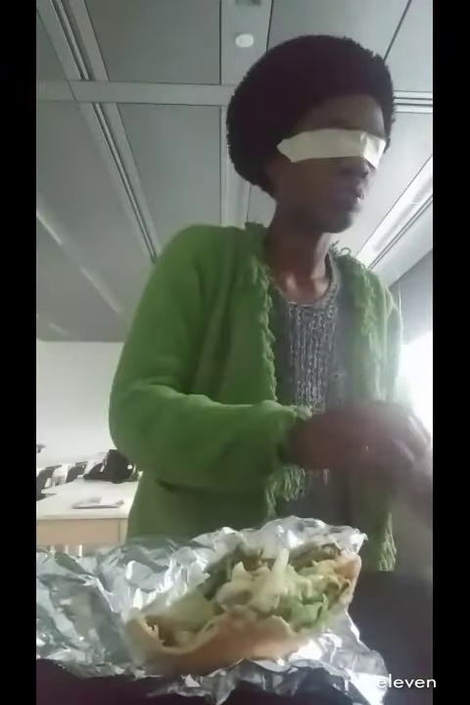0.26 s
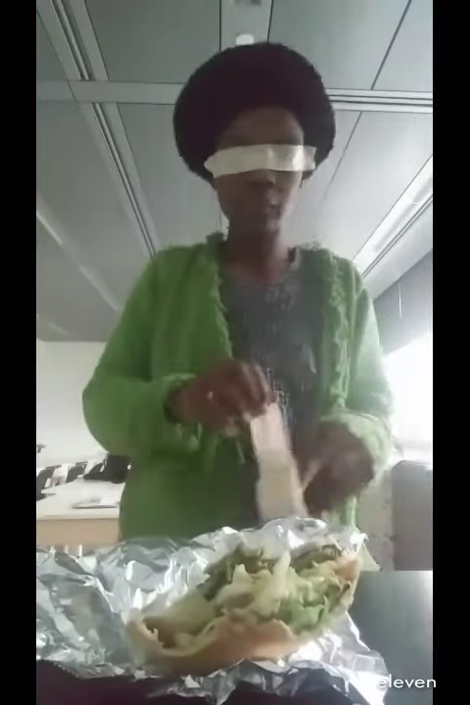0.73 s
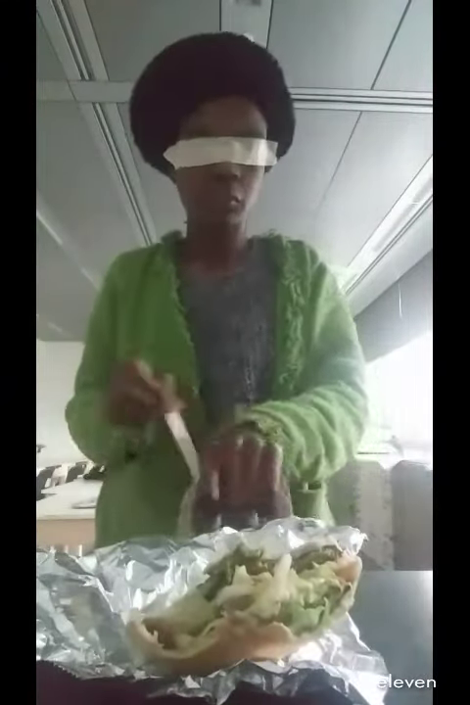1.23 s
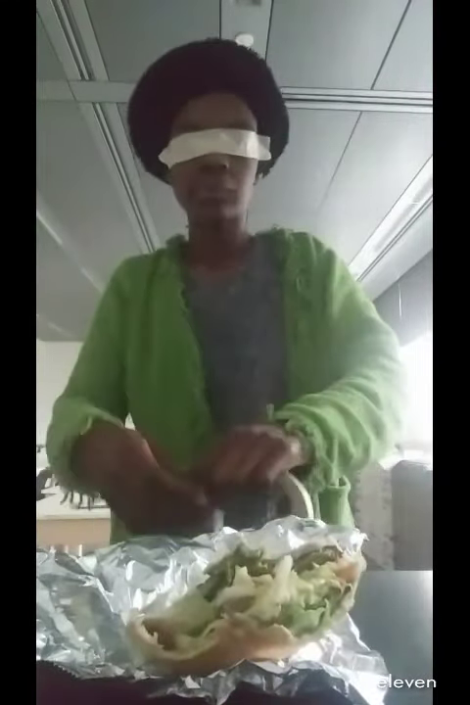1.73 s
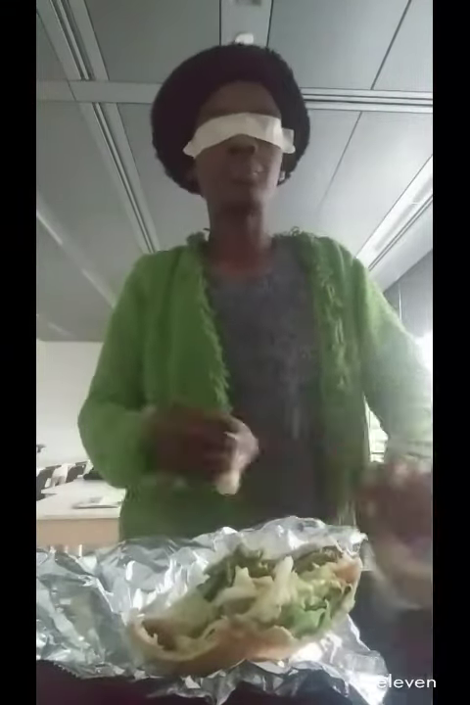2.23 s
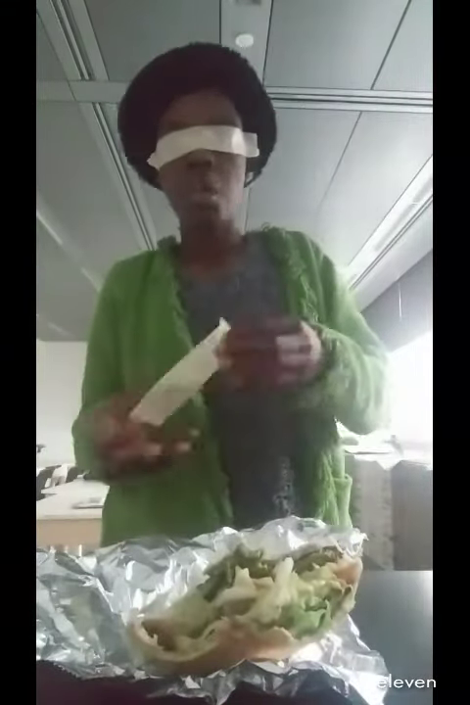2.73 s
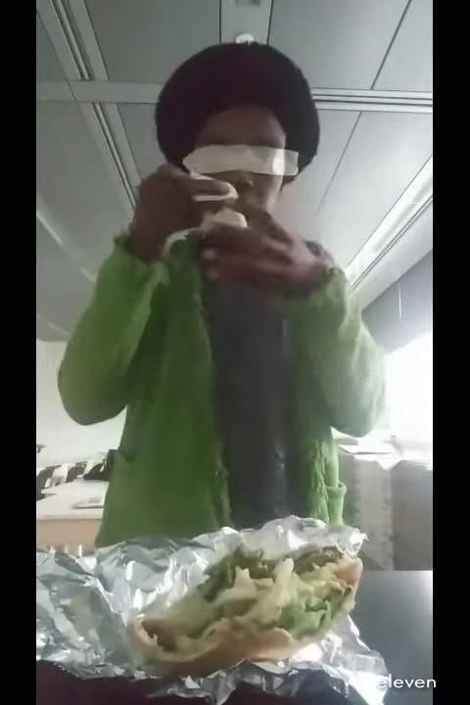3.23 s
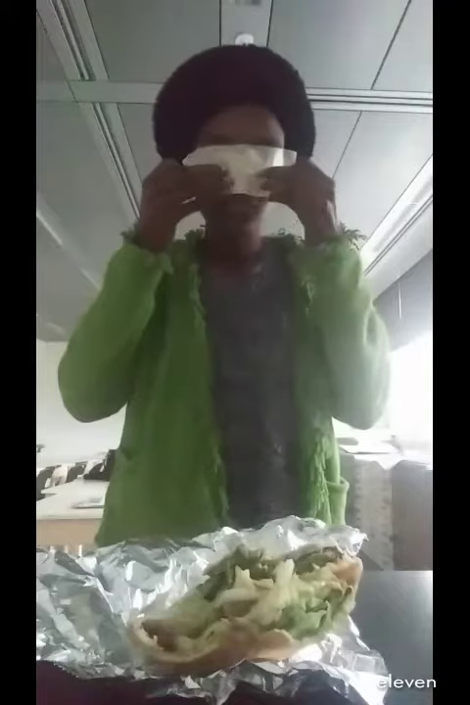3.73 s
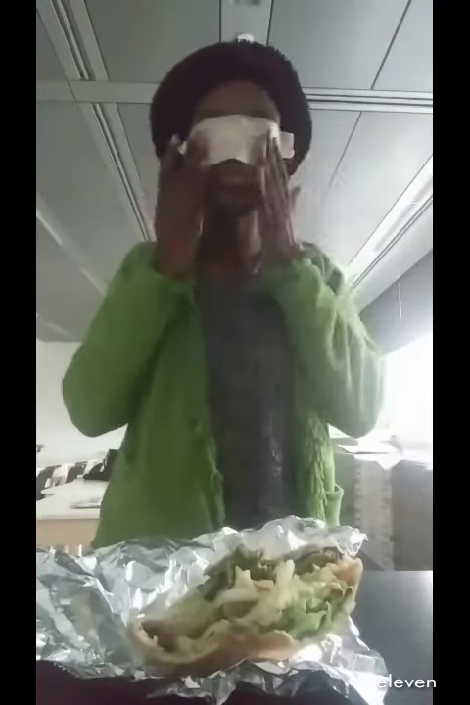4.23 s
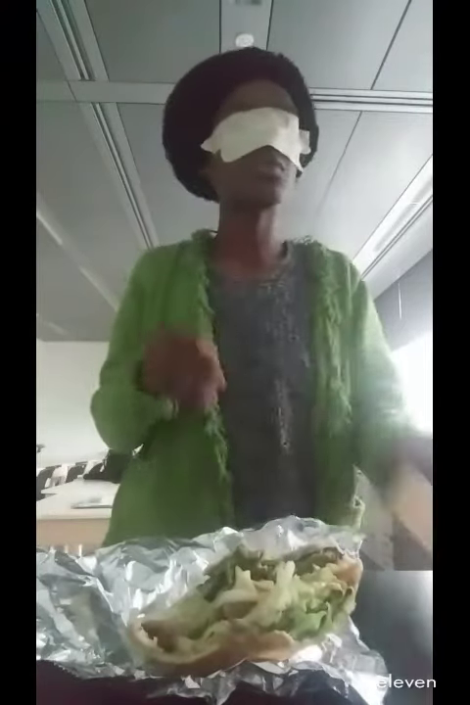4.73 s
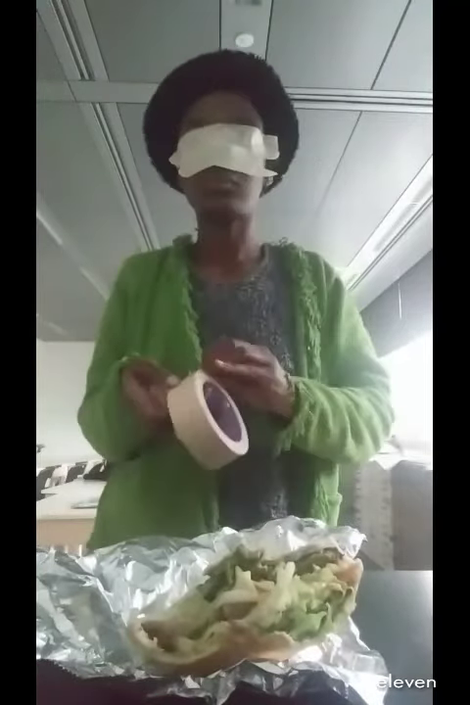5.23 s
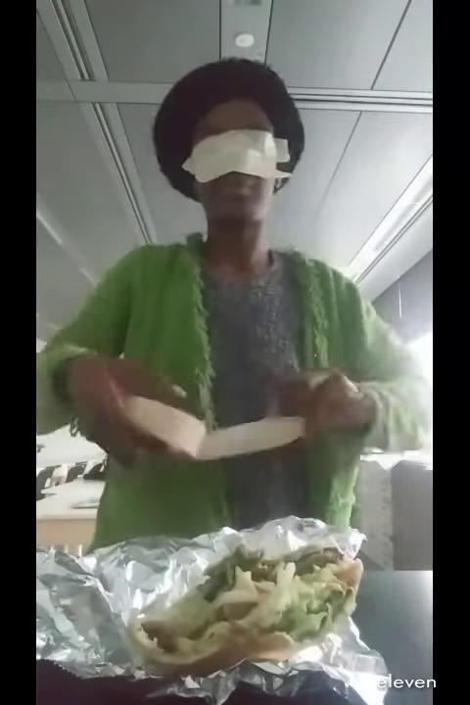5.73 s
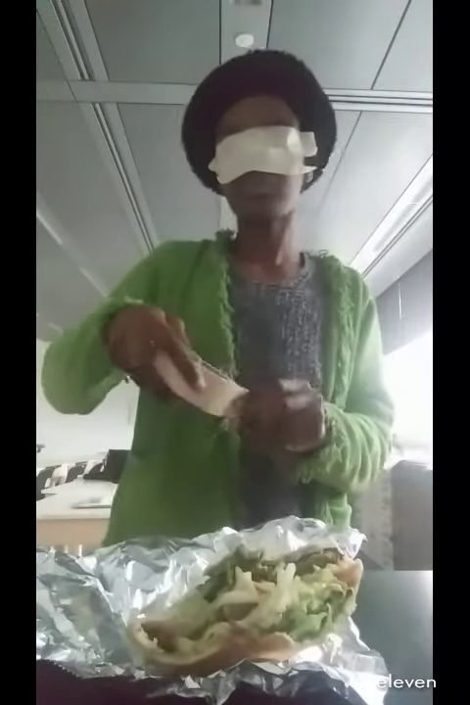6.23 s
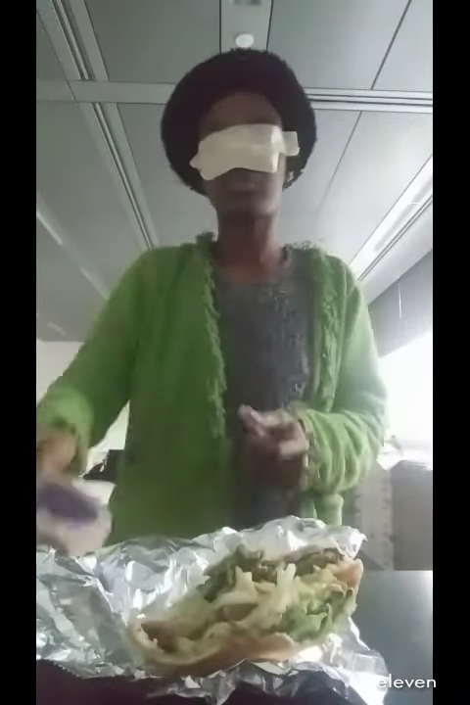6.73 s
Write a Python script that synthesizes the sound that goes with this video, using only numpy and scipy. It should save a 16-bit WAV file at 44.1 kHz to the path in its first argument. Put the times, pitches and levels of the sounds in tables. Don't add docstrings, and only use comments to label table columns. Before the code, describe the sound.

Masking tape is jerked off its roll in short harsh rips and torn, with desk knocks, finger rustle and faint ventilation hum.

```python
import sys
import numpy as np
from scipy import signal
from scipy.fft import rfft, irfft, next_fast_len
from scipy.io import wavfile
from scipy.ndimage import uniform_filter1d, minimum_filter1d, map_coordinates

SR = 44100
rng = np.random.default_rng(int(sys.argv[2]) if len(sys.argv) > 2 else 0)


def to_linear_factor(level_db):
    exponent = np.asarray(level_db, float) / 20
    return 10 ** exponent


def inscribe(sig):
    pcm = np.round(np.clip(np.atleast_2d(sig).T, -1, 1) * 32767)
    wavfile.write(sys.argv[1], SR, pcm.astype(np.int16))


N = 307377


def unit(x):
    return x / np.sqrt(np.mean(abs(x) ** 2) + 1e-20)


def along(points, hz):
    f, v = np.transpose(points)
    return np.interp(np.log(hz + 1), np.log(f + 1), v)


def filtered(x, response):
    m = next_fast_len(N + SR // 2)
    return irfft(rfft(x, m) * response(np.fft.rfftfreq(m, 1 / SR)), m)[..., :N]


def resonances(modes):
    def response(f):
        total = 0
        for k, (centre, width, db) in enumerate(modes):
            damping = 1j * f * width
            total = total + (-1) ** k * to_linear_factor(db) * damping / (centre ** 2 - f ** 2 + damping)
        return unit(total)
    return response


def steep(lo_hz, hi_hz):
    return lambda f: (1j * f / (lo_hz + 1j * f)) ** 3 * (hi_hz / (hi_hz + 1j * f)) ** 2


def wobble(rate):
    knots = rng.standard_normal(int(N * rate / SR) + 4)
    return map_coordinates(knots, [np.arange(N) * rate / SR])


def slips(rate, scatter_db):
    happens, luck, side = rng.random((3, 3, N))
    size = to_linear_factor(-scatter_db * np.log(luck + 0.00083)) * np.sign(side - 0.5)
    return unit(size * (happens < rate / SR))


# (frequency [Hz], width [Hz], level [dB])
CORE_MODES = [(720, 370, -8), (1103, 505, 2), (1664, 293, 7), (2488, 230, 4.5), (3320, 440, 1)]
# (frequency [Hz], width [Hz], level [dB])
STRIP_MODES = [(3790, 2020, 1.5), (4650, 1400, 7), (6000, 800, 3.5), (7630, 1950, -4)]
# (frequency [Hz], width [Hz], level [dB])
THREAD_MODES = [(9030, 610, -1), (11140, 2700, 1.5), (13600, 4500, -10.5)]


def ringing(drive):
    parts = (
        (CORE_MODES, steep(500, 3500)),
        (STRIP_MODES, steep(2590, 9600)),
        (THREAD_MODES, steep(7800, 19000)),
    )
    total = 0
    for force, (modes, skirt) in zip(drive, parts):
        total = total + to_linear_factor(4.0) * filtered(force, lambda f: resonances(modes)(f) * skirt(f))
    return total


def strokes(rows, edge_s, rate, scatter_db, clump_db):
    force, t = np.zeros((3, N)), np.arange(N) / SR
    for s, length, start_db, end_db, core_db, threads_db in rows:
        span = slice(round(s * SR), round((s + length + 6 * edge_s) * SR))
        u = t[span] - s
        shape = to_linear_factor(np.interp(u, [0, length], [start_db, end_db]))
        shape *= np.minimum(u / edge_s, 1)
        shape *= np.exp(-np.maximum(u - length, 0) / edge_s)
        force[:, span] += to_linear_factor([[core_db], [0], [threads_db]]) * shape
    clumps = to_linear_factor(clump_db * wobble(350))
    return ringing(force * clumps * slips(rate, scatter_db))


def patchy(x, depth_db):
    z = signal.stft(x, nperseg=256)[2]
    field = uniform_filter1d(rng.standard_normal(z.shape), size=7, axis=0)
    field = uniform_filter1d(field, size=6, axis=1)
    return signal.istft(z * to_linear_factor(depth_db * unit(field)), nperseg=256)[1][:N]


# (frequency [Hz], density [dB per Hz])
AIR_SPECTRUM = [(15, -65.5), (25, -34), (112, -21), (203, -9), (238, -5.5), (396, -5), (453, -8.5),
                (504, -9), (546, -7), (909, -6), (1010, -7), (1220, -10), (1400, -7), (3120, -22),
                (15200, -40.5)]
# (frequency [Hz], width [Hz], level [dB])
DUCT_MODES = [(400, 69, -6), (1007, 15, 0), (2530, 240, -14)]
# (frequency [Hz], width [Hz], level [dB])
WHINE_MODE = [(14070, 60, 0)]


def ventilation():
    hiss = unit(filtered(rng.standard_normal(N), lambda hz: to_linear_factor(along(AIR_SPECTRUM, hz))))
    hum = filtered(rng.standard_normal(N), resonances(DUCT_MODES))
    whine = filtered(rng.standard_normal(N), resonances(WHINE_MODE))
    hiss *= to_linear_factor(-60 + 1.7 * wobble(3.886))
    hum *= to_linear_factor(-62.5 + 1.8 * wobble(4.3))
    whine *= to_linear_factor(-99 + 5 * wobble(3))
    return hiss + hum + whine


# (frequency [Hz], t60 [s])
OFFICE_T60 = [(300, 0.15), (1500, 0.088), (5000, 0.11), (12000, 0.055)]


def office(x):
    out, step = np.zeros(N + SR), SR // 3
    for at in range(0, N, step):
        hz, t, z = signal.stft(rng.standard_normal(SR // 4), SR, nperseg=128)
        decay = to_linear_factor(-60 * t / along(OFFICE_T60, hz)[:, None])
        tail = signal.istft(z * decay, SR, nperseg=128)[1]
        wet = signal.fftconvolve(x[at:at + step], tail / np.linalg.norm(tail))
        out[at + 90:at + 90 + len(wet)] += wet
    return out[:N]


# (time [s], level [dB])
HAND_MOTION = [(0, -65.5), (.11, -62), (.47, -60), (.7, -65), (.87, -61), (1.49, -61), (2.101, -63.5),
               (2.97, -61), (3.139, -68), (3.42, -60.5), (3.63, -66), (4.64, -68), (5.1, -68), (5.4, -54),
               (5.601, -64), (6.15, -62.5), (6.771, -56), (6.97, -70)]


def rustle():
    s, level_db = np.transpose(HAND_MOTION)
    strip = np.interp(np.arange(N) / SR, s, level_db)
    threads = strip.mean() - 7.5 + 1.1 * (strip - strip.mean())
    colours = np.array([wobble(90) for _ in range(3)])
    ticks = 2.5 * wobble(25) + 3.2 * wobble(130) + 2.2 * colours
    force = to_linear_factor([strip - 8, strip - 3, threads - 3]) * unit(to_linear_factor(ticks))
    return ringing(force * slips(rate=22000, scatter_db=3.0))


# (time [s], length [s], force [dB], threads [dB])
FINGER_RUBS = [(0.01, 0.014, -48.5, -9), (.054, 0.014, -48, -12), (0.574, 0.018, -46, -11.5),
               (1.027, 0.035, -55, 1), (1.151, .05, -50.5, -6.5), (1.597, 0.07, -56.5, -9),
               (1.866, 0.067, -51, -6), (2.25, 0.012, -44, -15), (2.418, 0.056, -60, -6),
               (2.834, 0.046, -57, -6), (3.072, 0.018, -52, -10), (3.291, 0.012, -53, -5),
               (3.338, 0.039, -54.5, -10), (3.478, 0.012, -53, -11), (3.521, 0.023, -54.5, -10),
               (3.79, 0.019, -54.5, -12), (3.958, 0.053, -59.5, -8), (4.179, 0.06, -52, -11.5),
               (5.013, .015, -72, 12.5), (5.175, 0.046, -54.5, 0), (5.27, 0.3, -55.5, -6.5),
               (5.428, .07, -53, -26.5), (5.783, 0.042, -53.5, -6), (5.896, 0.025, -44, -4.5),
               (6.215, 0.031, -51.5, -9.5), (5.672, 0.033, -60.5, -6), (6.455, 0.057, -58, 11),
               (6.62, 0.027, -53.5, -11), (6.709, 0.013, -49, -16), (0.251, .37, -67.5, 5.5)]


def rubs():
    presses = [(s, length, db, db - 3, -1, threads_db) for s, length, db, threads_db in FINGER_RUBS]
    return strokes(presses, edge_s=0.005, rate=18000, scatter_db=1.8, clump_db=1.8)


def sliding(rows, width, lump_db, sag_per_s):
    light_touch_db = -26
    lumpy = rng.standard_normal(N) * to_linear_factor(lump_db * wobble(120))
    hz, t, z = signal.stft(lumpy, SR, nperseg=256)
    gain = np.zeros(z.shape)
    for start, hardest, end, db, centre_hz in rows:
        centre = centre_hz * np.exp(-sag_per_s * np.clip(t - hardest, 0, end - hardest))
        light_db = db + light_touch_db
        level_db = np.interp(t, [start, hardest, end], [light_db, db, light_db], -120, -120)
        peak = 1 / (1 + (np.log((hz[:, None] + 1) / centre) / width) ** 2)
        gain += to_linear_factor(level_db + 2.0) * peak / np.sqrt(width * centre / 3000)
    return signal.istft(z * gain, SR, nperseg=256)[1][:N]


# (start [s], hardest [s], end [s], level [dB], centre [Hz])
TAPE_SLIDES = [
    (.22, .33, 0.6, -48.5, 6200),
    (.48, .56, 0.81, -49.5, 5500),
    (5.175, 5.192, 5.4, -38, 6140),
    (5.232, 5.24, 5.262, -26.5, 6700),
    (6.465, 6.482, 6.72, -41.5, 6000),
]


def fingertip_slides():
    return sliding(TAPE_SLIDES, 0.3, lump_db=5, sag_per_s=2.9)


# (start [s], hardest [s], end [s], level [dB], centre [Hz])
CORE_SCRAPES = [
    (.5, .575, .63, -40, 1710),
    (5.4, 5.425, 5.475, -31, 2530),
]


def nail_scrapes():
    return sliding(CORE_SCRAPES, 0.058, lump_db=6.5, sag_per_s=1.1)


# (frequency [Hz], width [Hz], level [dB])
DESK_LOW_MODES = [(220, 150, -23), (405, 91, -1.5), (497, 78, -7.5), (632, 85, 1), (900, 140, -3.5),
                  (993, 47, -5.5)]
# (frequency [Hz], width [Hz], level [dB])
DESK_HIGH_MODES = [(1260, 200, -2.5), (1640, 180, 0.5), (1920, 120, 0.5), (2470, 160, -4),
                   (3180, 600, -16.5), (5400, 2000, -25.5)]
# (time [s], peak [dB], brightness [dB], ring t60 [s], pitch factor)
DESK_KNOCKS = [(0.742, -55, -47, 0.074, 0.45), (1.064, -38, -34, 0.3, 1.03),
               (1.127, -40.5, -41, 0.097, .85), (1.335, -56.5, -24, 0.043, 0.61),
               (1.443, -33.5, -30, 0.11, .72), (2.266, -20.5, -6.5, 0.16, 1.025),
               (2.281, -27, -1, 0.16, 0.996), (4.717, -47, -23, 0.054, 0.96),
               (5.395, -42.5, -33, 0.23, 0.68), (5.521, -29, -6.5, 0.19, 0.72),
               (6.752, -31.5, -30, .035, 0.813), (6.809, -23.5, -26, 0.093, 1.03),
               (6.816, -23, -28.5, 0.064, 0.954)]


def knocks():
    contact_ms = 3.404
    out, t, f = np.zeros(N + SR), np.arange(SR // 4) / SR, np.fft.rfftfreq(SR // 2, 1 / SR)
    for s, db, bright_db, t60, pitch in DESK_KNOCKS:
        u = t / (contact_ms * 0.00052 + 1e-4)
        contact = 0.6 * u * np.exp(1 - u)
        rattle = 0.4 * to_linear_factor(-60 * t / t60) * np.minimum(u, 1)
        push = rng.standard_normal(len(t)) * (contact + rattle)
        push[round(contact_ms * 1e-3 * SR)] += 16
        push[20] -= 9
        soft = (1 + 1j * f / 500) ** (bright_db / 25)
        desk = soft * resonances(DESK_LOW_MODES)(f / pitch)
        desk = desk + to_linear_factor(bright_db) * resonances(DESK_HIGH_MODES)(f / pitch)
        ring = irfft(rfft(push, SR // 2) * desk * steep(60, 9000)(f))
        out[round(s * SR):][:len(ring)] += to_linear_factor(db + 9.5) * ring / abs(ring).max()
    return out[:N]


# (time [s], peak [dB], core ring [dB], threads [dB], ring [Hz])
TAPE_CRACKS = [(0.0157, -30, 2, -13, 2480), (1.976, -39, 9, -9, 1800), (2.0311, -35.5, 11.5, -9, 1710),
               (3.889, -25.5, -5.5, -7, 2560), (3.437, -36, 5.5, -12, 3100), (4.009, -38.5, 9, -32, 3000),
               (4.7671, -16, 7, -10, 1980), (5.242, -18, .5, -6.5, 2470), (5.7967, -29, -2, -11.5, 1530),
               (5.891, -25.5, 9.5, -8.5, 1500), (6.4148, -20.5, 6, -2, 1400),
               (6.4841, -33.5, -2, 4.5, 2470), (6.6107, -13.5, 5, -2, 1570), (6.797, -36, -6, -7, 1170),
               (6.819, -32.5, 14.5, -8.5, 2520), (6.9485, -30, -10, -7, 3760)]
# (time [s], peak [dB], core ring [dB], threads [dB])
LOW_TICKS = [(0.0756, -50.5, 8.5, -3), (0.3884, -44, -9, -14), (.4825, -46, -7, -6), (0.565, -40, 6.5, -8),
             (0.5828, -35, 3, -9), (.603, -40, 8, -10), (0.62, -29.5, 0.5, -13), (0.748, -50, 10, -2.5),
             (0.856, -53.5, 13.5, -9), (0.898, -52.5, 6.5, -18.5), (1.1765, -57, 24, -6),
             (1.196, -45, -2, 1.5), (1.2529, -50.5, 14.5, -13), (1.3237, -58.5, 16.5, 6),
             (1.668, -44, 2, -10), (1.8343, -46, 6, -8), (1.8804, -47, 10.5, -3), (2.2283, -42, 1, -11),
             (2.5413, -51, -11, 0), (2.7237, -54.5, 13, -5), (2.799, -48.5, 5.5, -2),
             (2.878, -41.5, 5.5, -8), (3.0852, -45, 8.5, -15), (4.03, -51, 9.5, -9),
             (4.323, -48.5, -10, -21), (5.983, -48, 6.5, -13), (6.266, -40, -1.5, -25),
             (6.3557, -48, 2, -27), (6.3738, -62.5, 24, -8), (6.686, -45, -4, -15)]
# (time [s], peak [dB], core ring [dB], threads [dB])
HIGH_TICKS = [(0.153, -66.5, 15, -15.5), (.3347, -56, -20, 3), (0.3746, -47, -2, -7), (0.419, -48, 1, -2),
              (1.6097, -43.5, 0, 1), (1.6384, -48, 7.5, -7), (2.089, -62.5, 15, -23),
              (2.428, -49, -17, -22), (2.563, -50, -1, -9), (2.602, -56, -6, -20), (2.8474, -40, -21, -13),
              (3.0938, -37.5, -16, -14), (3.1268, -46, 1, -8), (3.49, -44.5, -14, -19),
              (3.5907, -43.5, 6.5, -13), (3.8203, -41.5, 7, -6.5), (3.8422, -39.5, 2, -26.5),
              (4.0786, -51, -12, -31), (4.1715, -48.5, 0, -30), (4.8464, -57, -6.5, -7),
              (5.194, -40, -30, 0), (5.7264, -42.5, -5, -23), (5.7556, -45, -4, -10),
              (6.181, -40, 2.5, -13), (6.223, -40, -0.5, -18), (6.2997, -48, -9, -25),
              (6.528, -41, -19, -3), (6.7082, -32.5, -4, -31)]


def snaps():
    crack_ms, tick_ms = 0.7, 1.7
    low_hz, high_hz = 1600, 2537
    rows = [(*row, crack_ms) for row in TAPE_CRACKS]
    rows += [(*row, low_hz, tick_ms) for row in LOW_TICKS]
    rows += [(*row, high_hz, tick_ms) for row in HIGH_TICKS]
    drive, ring, t = np.zeros((3, N + SR)), np.zeros(N + SR), np.arange(SR // 40) / SR
    for s, db, core_db, threads_db, ring_hz, spread_ms in rows:
        noise = rng.standard_normal(len(t))
        at = round((s - 0.001) * SR)
        u = t / (spread_ms * 0.00093 + 1e-4)
        swell = u * np.exp(1 - u)
        detuned_hz = ring_hz * (1 + 0.03 * noise[0])
        part_db = db + np.array([[core_db - 9], [-3], [threads_db - 0.5]])
        drive[:, at:at + len(t)] += to_linear_factor(part_db) * swell * noise
        tone = swell ** 1.8 * np.sin(2 * np.pi * detuned_hz * t)
        ring[at:at + len(t)] += to_linear_factor(db + core_db - 3.5) * tone
    return ringing(drive[:, :N]) + ring[:N]


def peeling(rows, threads_db, creaks=()):
    slack_s, slack_db, slack_fade_db = 0.016, -9, -14.5
    runs = list(creaks)
    for s, length, db, fade_db, core_db in rows:
        end_db = db + fade_db
        last_db = end_db + slack_db
        runs.append((s, length, db, end_db, core_db, threads_db))
        runs.append((s + length, slack_s, last_db, last_db + slack_fade_db, core_db, threads_db))
    return strokes(runs, edge_s=0.002, rate=10000, scatter_db=2.4, clump_db=2)


# (time [s], length [s], force [dB], fade [dB], core ring [dB])
STRIP_TEARS = [
    (2.131, 0.012, -20, -2.5, 1.5),
    (5.11, .012, -19, -4.5, -6.5),
    (6.607, 0.0052, -18, -4, -3.5),
]


def tears():
    return peeling(STRIP_TEARS, threads_db=-9)


# (time [s], length [s], force [dB], fade [dB], core ring [dB])
ROLL_JERKS = [
    (0.637, 0.027, -17.5, -1.5, -0.5),
    (1.059, 0.034, -17, -2, -4),
    (1.128, 0.0082, -16.5, -0.5, -2),
    (1.441, 0.025, -19.5, 5, -3.5),
    (5.386, 0.032, -15, 0, -5),
    (5.521, 0.014, -13.5, -5, -3),
]


def jerks():
    threads_db = -5.5
    creak_s, creak_db, creak_rise_db = 0.011, -17, 10
    creaks = []
    for s, _, db, _, core_db in ROLL_JERKS:
        end_db = db + creak_db
        creaks.append((s - creak_s, creak_s, end_db - creak_rise_db, end_db, core_db, threads_db))
    return peeling(ROLL_JERKS, threads_db, creaks)


def scene():
    air = ventilation()
    fingers = patchy(rubs() + rustle(), depth_db=2.2) + fingertip_slides() + nail_scrapes()
    near = knocks() + snaps() + patchy(tears() + jerks(), depth_db=3.0)
    direct = near + fingers
    return (direct + to_linear_factor(-11.5) * office(direct) + air)[None]


def top_cut(x):
    return signal.sosfilt(signal.butter(12, 16470, fs=SR, output="sos"), x)


# (frequency [Hz], level [dB])
TREBLE_EDGE = [(14500, 0), (15350, -2), (15600, -28), (16400, -44)]


def record(dry):
    needed = np.minimum(1, 0.6 / (abs(dry) + 1e-9))
    held = dry * uniform_filter1d(minimum_filter1d(needed, size=89), size=45)
    held = held + 0.03 * filtered(held ** 2, steep(11, 9000))
    mix = filtered(held, lambda hz: to_linear_factor(along(TREBLE_EDGE, hz)))
    return top_cut(mix)


dry = scene()
out = record(dry)
inscribe(out)
```